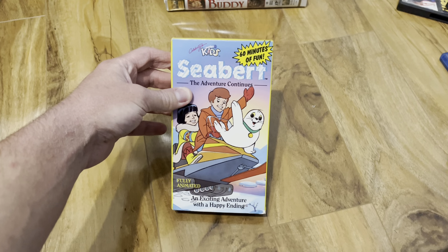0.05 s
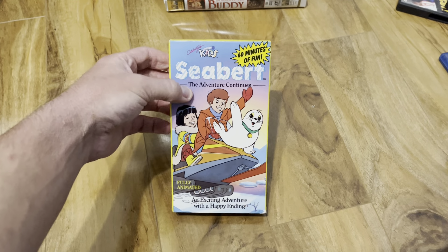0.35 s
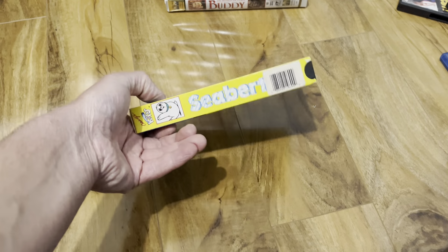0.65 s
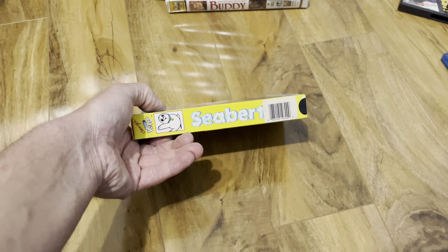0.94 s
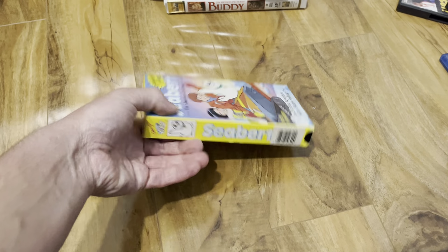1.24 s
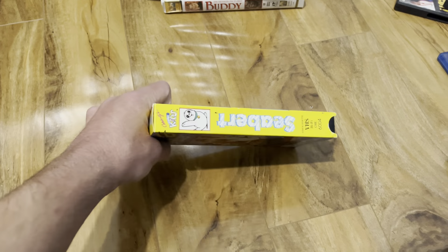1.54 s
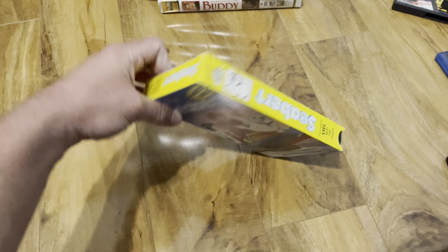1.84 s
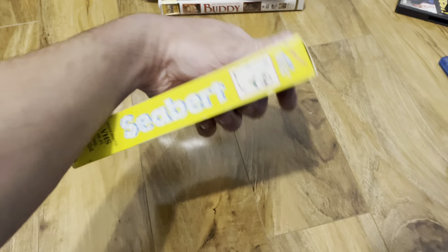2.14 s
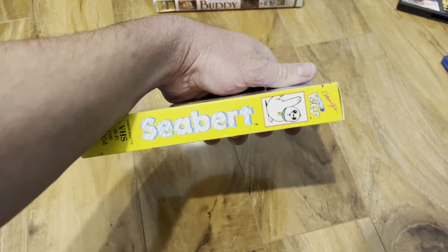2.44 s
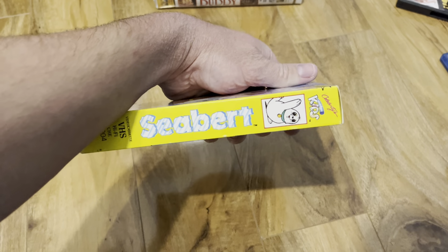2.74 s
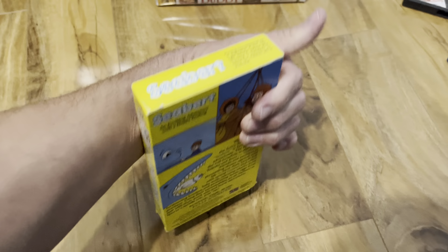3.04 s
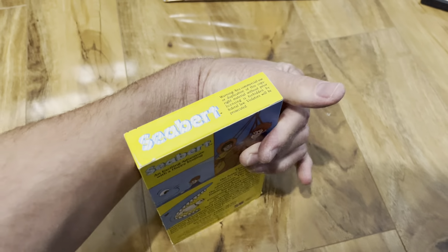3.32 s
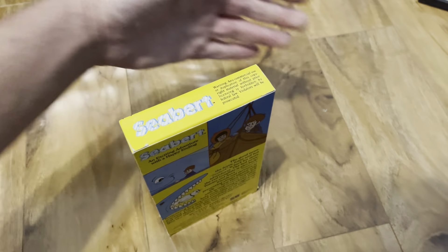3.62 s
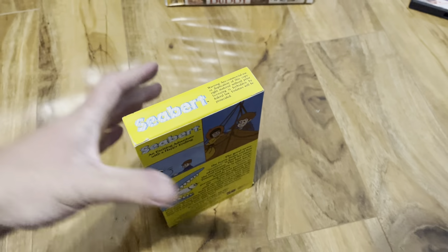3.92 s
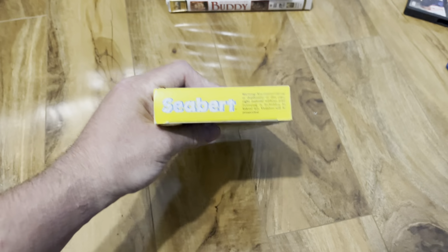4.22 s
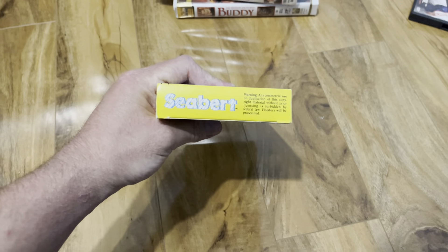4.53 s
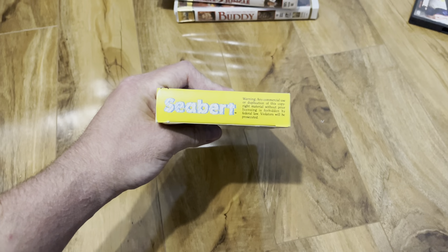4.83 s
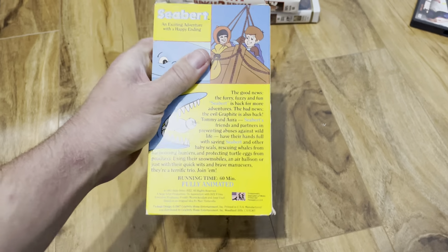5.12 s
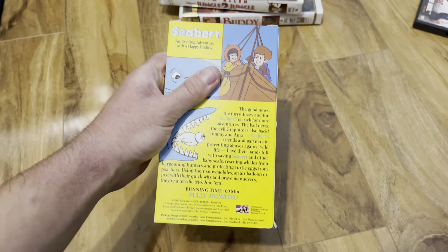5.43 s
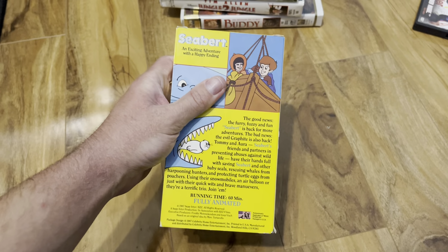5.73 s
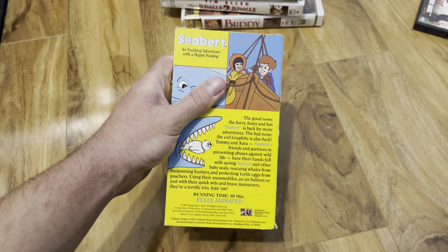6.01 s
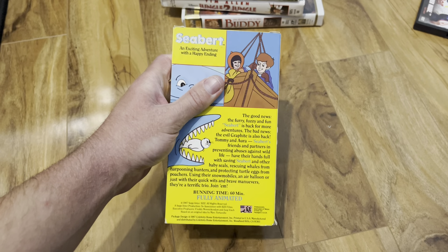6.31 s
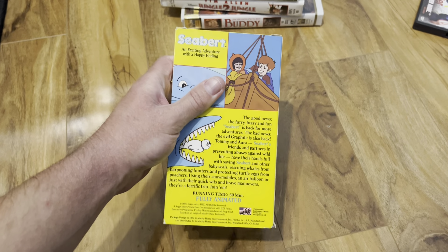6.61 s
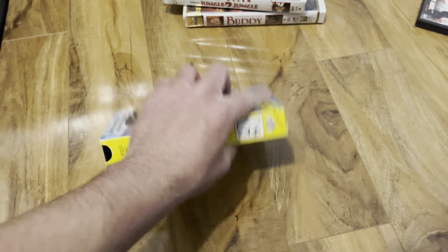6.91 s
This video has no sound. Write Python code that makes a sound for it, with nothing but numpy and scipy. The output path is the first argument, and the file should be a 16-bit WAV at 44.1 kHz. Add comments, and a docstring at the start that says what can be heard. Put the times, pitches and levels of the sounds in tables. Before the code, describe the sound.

A plastic video cassette in a cardboard sleeve is handled close to the microphone. Faint finger taps and rubbing lead to a light knock at 0.8 seconds. Around 1.3 to 1.4 seconds come louder hollow thuds, with a short rattle of loose plastic as the cassette shifts inside. Skin slides on the card, swelling into another clattering knock at 2.1. After more scuffs and taps, the box knocks on the wooden floor at about 3.1. Soft rubbing and a faint low rumble of movement follow, then gentler rattling knocks near 4.1 and 5.1. It is almost quiet until 6.7, when fingers rub and tap again and the box lands with a loud clack at 7 seconds and a thud just after. A faint low hum runs underneath, and the small room adds a short echo.

```python
"""A plastic video cassette in its cardboard sleeve is turned by hand and set down on a wooden floor.
Each landing is a thud of the box and a rattle of the loose reels and flap, then a weaker rebound.
Fingers rub, catch and tap on the card, and the cassette shifts inside it.
A small room with a low hum answers; a close stereo microphone picks up soft bumps of handling."""
import sys
import numpy as np
from scipy import signal
from scipy.fft import rfft, irfft, next_fast_len
from scipy.io import wavfile
from scipy.ndimage import uniform_filter1d

SR = 44100
rng = np.random.default_rng(int(sys.argv[2]) if len(sys.argv) > 2 else 0)


def generate_wav(signal):
    """Clip the signal to [-1, 1] and save it as 16-bit WAV at the path in sys.argv[1]."""
    frames = np.transpose(np.atleast_2d(signal))
    scaled = np.clip(frames, -1, 1) * 32767
    pcm = np.round(scaled).astype(np.int16)
    wavfile.write(sys.argv[1], SR, pcm)


N = 315756
TAPS = 4096
TAP_HZ = np.fft.rfftfreq(TAPS, 1 / SR)
PADDED = next_fast_len(N + TAPS)


def amp(db):
    """Decibels to gain."""
    return 10 ** (np.asarray(db) / 20)


def unit(x):
    """Scales to rms 1."""
    return x / np.sqrt(np.mean(x ** 2) + 1e-20)


def read(points, hz):
    """Interpolates a table on a log-frequency axis."""
    f, value = np.transpose(points)
    return np.interp(np.log(hz + 1), np.log(f + 1), value)


def add(mix, s, sound):
    """Lays a sound into the mix at time s."""
    part = mix[..., max(round(s * SR), 0):][..., :sound.shape[-1]]
    part += sound[..., :part.shape[-1]]


def gate(t, start, end, attack_s, release_s):
    """Rises before the start, holds, falls after the end."""
    return np.clip(np.minimum((t - start) / attack_s, (end - t) / release_s) + 1, 0, 1)


def hump(hz, centre_hz, octaves):
    """Resonance, bell-shaped in log frequency."""
    return np.exp(-.5 * (np.log2((hz + 1) / centre_hz) / max(octaves, .1)) ** 2)


def treble(hz):
    """Share of a frequency in the top band."""
    return np.clip((hz - 7000) / 2500, 0, 1)


def causal(db):
    """Impulse response of a passive body with this gain over TAP_HZ."""
    log_gain = np.log(amp(np.concatenate([db, db[-2:0:-1]])))
    return np.fft.ifft(np.exp(np.conj(signal.hilbert(log_gain)))).real


def wander(shape, first_span, last_span):
    """Noise of rms 1, smoothed along its first axis, then its last."""
    rough = uniform_filter1d(rng.standard_normal(shape), first_span, axis=0)
    return unit(uniform_filter1d(rough, last_span))


def swing(t, hz, decay_cycles):
    """Heavily damped vibration with a soft start."""
    cycles = hz * t
    return np.sin(2 * np.pi * cycles) * np.exp(-cycles / decay_cycles) * (1 - np.exp(-cycles / .49))


# left-right likeness: (frequency [Hz], correlation [clipped to 0-1])
STEREO_LIKENESS = [(60, 0.96), (280, 0.64), (380, 1.16), (650, 0.28), (1100, 0.25), (3000, 0.44),
                   (7000, 0.14), (12000, 0.57)]
def pair(z, hz, power=1, least=0):
    """Blends two unrelated spectra into partly alike left and right."""
    likeness = np.clip(read(STEREO_LIKENESS, hz) ** power, least, 1)
    common, apart = z[0] * np.sqrt((1 + likeness) / 2), z[1] * np.sqrt((1 - likeness) / 2)
    return np.array([common + apart, common - apart])


# hum and hiss: (frequency [Hz], relative density [dB])
HUM_SPECTRUM = [(15, -37), (28, -13.5), (53, -4), (90, -10), (121, -7.5), (178, -14.5), (205, -14.5),
                (235, -13.5), (275, -14.5), (337, -14), (430, -18), (600, -30.5), (820, -35.5), (1400, -35),
                (2400, -45.5), (7000, -51), (16000, -61.5)]
def hum(level_db=-62.5):
    """Steady low noise of the room."""
    hz = np.fft.rfftfreq(N, 1 / SR)
    noise = pair(rfft(rng.standard_normal((2, N))), hz, power=2)
    return amp(level_db) * unit(irfft(noise * amp(read(HUM_SPECTRUM, hz)), N))


# room decay: (frequency [Hz], t60 [s])
ROOM_DECAY = [(100, 1.1), (300, 0.1154), (1000, 0.3277), (2500, 0.2655), (5000, 0.27), (10000, 0.2541),
              (15000, 0.28)]
# reflection strength: (frequency [Hz], gain [dB])
ROOM_GAIN = [(60, -11), (250, -8.5), (550, -8), (1000, -7), (2500, -5.5), (5000, -4.5), (11000, -10.5),
             (15000, -16)]
def room(x, first_s=.0027, build_s=.0031):
    """Dense floor and wall reflections, each band dying at its own rate."""
    hz, t, noise = signal.stft(rng.standard_normal((2, 2 * SR // 3)), SR, nperseg=256)
    hz = hz[:, None]
    t60 = read(ROOM_DECAY, hz)
    decay = amp(read(ROOM_GAIN, hz) - 60 * t / t60) * np.sqrt(2 * np.log(1000) / (t60 * SR))
    tail = signal.istft(pair(noise, hz) * decay, SR, nperseg=256)[1]
    tail *= np.clip((np.arange(tail.shape[1]) / SR - first_s) / build_s, 0, 1)
    return signal.fftconvolve(x, tail, axes=1)[:, :N]


def echoes(x):
    """The box moves, so its sound crossfades among three echo patterns."""
    turn = 2 * np.pi * np.arange(N) / SR
    weights = np.cos(turn), np.sin(turn) * np.cos(np.e * turn), np.sin(turn) * np.sin(np.e * turn)
    return sum(room(x * weight) for weight in weights)


# arm movements: (start [s], end [s], level [dB])
ARM_SWINGS = [(0.7, 1.5, -63.5), (2.052, 2.5, -58), (2.798, 2.951, -57), (3.4, 3.801, -49.5),
              (3.95, 4.3, -54.5), (6.4, 7.099, -63.5)]
def arm_rumble(centre_hz=58, width_octaves=.61, ramp_s=.21):
    """Low flutter as the arm swings round to change grip."""
    t, hz = np.arange(N) / SR, np.fft.rfftfreq(N, 1 / SR)
    noise = irfft(rfft(rng.standard_normal(N)) * hump(hz, centre_hz, width_octaves), N)
    swells = [amp(db) * gate(t, start, end, ramp_s, ramp_s) for start, end, db in ARM_SWINGS]
    return unit(noise) * np.max(swells, axis=0)


# handling bumps, and floor pushes under heavy landings: (time [s], relative level [dB], pitch [Hz])
LOW_BUMPS = [(0.697, -48, 47.7), (1.228, -52, 57), (2.112, -37, 85.05), (2.53, -44.5, 54.5),
             (2.785, -49, 64.9), (3.249, -48.5, 55.6), (3.753, -44.5, 167), (3.78, -40.5, 53.4),
             (4.246, -43, 60.8), (4.325, -48, 116.3), (6.653, -51.5, 54.1), (6.968, -35.5, 91)]
def bumps(gain_db=6):
    """Soft low pushes of the hand, or of the floor under a heavy landing, a cycle or two each."""
    out, t = np.zeros(N), np.arange(SR // 4) / SR
    for s, db, hz in LOW_BUMPS:
        age = hz * t / .93
        envelope = age * np.exp(1 - 1.25 * age)
        add(out, s, amp(db + gain_db) * envelope * np.sin(2 * np.pi * hz * t))
    return out


def swish(start_s=3.612, length_s=.1, level_db=-65.5, start_hz=4150, fall_hz_per_s=4500, width_hz=600):
    """The palm's ridges run off the sleeve's edge: a fuzzy pitch that falls as the hand slows."""
    out, t = np.zeros((2, N)), np.arange(0, length_s, 1 / SR)
    cycles = np.cumsum(start_hz - fall_hz_per_s * t) / SR
    noise = rng.standard_normal((2, len(t))) + 1j * rng.standard_normal((2, len(t)))
    blur = signal.sosfilt(signal.butter(2, width_hz / 2, fs=SR, output="sos"), noise)
    arch = np.sqrt(abs(np.sin(np.pi * t / length_s)))
    add(out, start_s, amp(level_db) * arch * unit((blur * np.exp(2j * np.pi * cycles)).real))
    return out


def catches(n, per_s):
    """Sparse stick-slip clicks of uneven size, separate per side."""
    return np.array([(rng.random(n) < per_s / SR) * rng.choice([-1, 1], n)
                     * amp(4.3 * np.minimum(rng.exponential(1, n), 3)) for side in range(2)])


def patchy(x, depth_db=3.5):
    """Friction grips unevenly, in patches about 20 ms long and narrow in frequency."""
    z = signal.stft(x, nperseg=512)[2]
    return signal.istft(z * amp(depth_db * wander(z.shape, 6, 4)), nperseg=512)[1][:, :N]


# strokes: (start [s], end [s], relative start level [dB], relative end level [dB], treble trim [dB])
RUB_STROKES = [(0.327, 0.39, -66, -71, -15), (0.418, 0.531, -56.5, -54.5, -14),
               (0.588, 0.642, -60, -62.5, -15.5), (0.74, 0.8, -64.5, -65, -11),
               (1.249, 1.292, -64, -59.5, -12), (1.735, 1.932, -68.5, -58, -10.5),
               (1.935, 2.093, -53.5, -43.5, -13.5), (2.852, 2.949, -53.5, -50, -8),
               (2.967, 3.127, -59, -60.5, -15.5), (3.282, 3.438, -60.5, -64, -12.5),
               (3.548, 3.685, -70.5, -61, 2), (3.71, 3.764, -60.5, -69, -12.5),
               (3.799, 4.025, -73.5, -59, -6.5), (4.975, 5.059, -61, -51, -8),
               (6.716, 6.836, -72.5, -53.5, -12.5), (6.849, 6.94, -53, -63.5, -11)]
# skin on card: (frequency [Hz], relative density [dB])
RUB_SPECTRUM = [(100, -20), (330, 8), (750, -4), (1300, -3), (2400, -4.5), (4000, -8.5), (6600, -8.5),
                (9500, -5), (12500, -8.5), (14300, -14), (15600, -25)]
def rubbing(gain_db=-2, top_gain_db=4, catches_per_s=350, grain_db=-4, flutter_db=2):
    """Skin slides on card: a fine, uneven hiss with small catches."""
    t, hz = np.arange(N) / SR, np.fft.rfftfreq(N, 1 / SR)
    middle_gain, top_gain = np.zeros((2, N))
    for start, end, start_db, end_db, treble_db in RUB_STROKES:
        stroke = gate(t, start, end, attack_s=.026, release_s=.03)
        stroke *= amp(np.interp(t, [start, end], [start_db, end_db]))
        middle_gain = np.maximum(middle_gain, stroke)
        top_gain = np.maximum(top_gain, stroke * amp(treble_db + top_gain_db))
    grit = rng.standard_normal((2, N)) + amp(grain_db) * unit(catches(N, catches_per_s))
    friction = pair(rfft(patchy(grit)), hz) * amp(read(RUB_SPECTRUM, hz))
    middle = middle_gain * unit(irfft(friction * (1 - treble(hz)), N))
    top = top_gain * unit(irfft(friction * treble(hz), N))
    return amp(gain_db + flutter_db * wander(N, 500, 300)) * (middle + top)


def slide(length_s, db, centre_hz, octaves, slips_per_s=2500):
    """Tiny slips through one resonance of the card, swelling to a peak TAPS samples in."""
    t = np.arange(-TAPS, TAPS) / SR
    hz = np.fft.rfftfreq(len(t), 1 / SR)
    slips = pair(rfft(catches(len(t), slips_per_s)), hz)
    swell = np.exp(-2 * (t / length_s) ** 2)
    sound = swell * irfft(slips * hump(hz, centre_hz, octaves))
    return amp(db) * unit(sound) * np.sqrt(np.mean(swell ** 2))


# fingertip catches: (peak time [s], relative level [dB], centre [Hz])
FINGER_SCUFFS = [(.423, -55, 3800), (.58, -56.5, 1690), (.693, -66, 2740), (1.939, -46.5, 2680),
                 (2.916, -47, 3220), (2.93, -46.5, 2180), (3.397, -61, 3010), (3.481, -70, 3170),
                 (5.021, -53.5, 1490), (5.44, -80.5, 2200), (5.61, -78, 2000), (6.697, -71, 4980),
                 (6.888, -50.5, 3000)]
# cassette settling: (peak time [s], length [s], relative level [dB], centre [Hz], width [octaves])
CASSETTE_SHIFTS = [(0.821, 0.016, -32.5, 376, 1.45), (1.329, .032, -22.5, 370.6, 1.42),
                   (1.395, .05, -25, 562, 1.82), (2.109, 0.018, -26, 2180, 1.1),
                   (2.13, .024, -25, 258.4, 0.58), (3.137, .006, -25, 999, 0.7),
                   (3.15, .018, -39, 259, 1.4), (4.099, 0.039, -36, 259, 0.3),
                   (5.068, 0.021, -37, 1800, 1.8), (5.095, .013, -25, 560, 1.42),
                   (6.959, 0.015, -38, 2300, 0.9), (6.98, 0.0039, -18, 1610, 0.14),
                   (6.993, 0.033, -23.5, 396, 0.63)]
def scuffs(gain_db=2, finger_s=.00606, finger_octaves=.65):
    """Fingertips slip on the outside of the sleeve, the cassette on the inside."""
    out = np.zeros((2, N))
    for s, db, centre_hz in FINGER_SCUFFS:
        add(out, s - TAPS / SR, slide(finger_s, db + gain_db, centre_hz, finger_octaves))
    for s, length_s, db, centre_hz, octaves in CASSETTE_SHIFTS:
        add(out, s - TAPS / SR, slide(length_s, db + gain_db, centre_hz, octaves))
    return out


# floorboard modes: (highest pitch [Hz], relative level [dB], decay [cycles])
BOARD_MODES = [(223, -8.5, 0.52), (301, -6.5, 2.8)]
def floorboards(t, thud_db):
    """The boards vibrate under a knock, at a different pitch each time."""
    return sum(amp(thud_db + db) * swing(t, hz * rng.uniform(.75, 1), cycles)
               for hz, db, cycles in BOARD_MODES)


def hollow(t, thud_db, centre_hz=540, width_octaves=.84, gain_db=28, decay_ms=9.2):
    """The box rocks and its air cavity booms briefly."""
    rocking = rng.standard_normal(len(t)) * np.exp(-t * 1000 / decay_ms)
    cavity = hump(TAP_HZ, centre_hz, width_octaves)
    boom = irfft(rfft(rocking) * rfft(causal(20 * np.log10(cavity + 1e-4))))
    return amp(thud_db + gain_db) * boom / np.linalg.norm(boom) * np.sqrt(np.mean(cavity ** 2))


# cassette shell modes: (frequency [Hz], relative level [dB])
SHELL_MODES = [(265, -3.5), (335, -0.5), (500, 3), (620, -4), (943, -7.5), (1061, -5.5), (1160, -9),
               (1394, -7), (1469, -7), (1600, -9.5), (1954, -12.5), (2330, -15), (2474, -7.5), (3000, -13),
               (3306, -15.5), (3491, -16.5), (3880, -9.5)]
def shell_ring(t, thud_db, thud_hz, clack_db, gain_db=-13, t60_s=.07, rise_s=.00084):
    """The thud drives modes near its pitch, the clack the high ones; the sleeve damps them."""
    hz, db = np.transpose(SHELL_MODES)[:, :, None]
    drive = amp(thud_db) * hump(hz, thud_hz, .9) + amp(clack_db) * (hz > 1000)
    gripped_hz = hz * rng.uniform(.99, 1.01, hz.shape)  # the grip detunes the shell
    phase = rng.random(hz.shape)
    side_phase = (1 - read(STEREO_LIKENESS, hz)) * rng.uniform(-.5, .57, (2,) + hz.shape)
    modes = drive * amp(db + gain_db) * np.sin(2 * np.pi * (gripped_hz * t + phase + side_phase))
    return modes.sum(1) * np.exp(-np.log(1000) * t / t60_s) * (1 - np.exp(-t / rise_s))


def chatter(t, decay_ms, rise_s=.0008):
    """Dying burst of tiny contacts: even spectrum, energy 1 per side."""
    envelope = np.exp(-t * 1000 / decay_ms) * (1 - np.exp(-t / rise_s))
    spectra = rfft(rng.standard_normal((2, len(t))) * envelope)
    ripple_db = 10 * np.log10(uniform_filter1d(abs(spectra) ** 2, size=61) + 1e-9)
    burst = np.array([signal.fftconvolve(irfft(side), causal(-db))[:len(t)]
                      for side, db in zip(spectra, ripple_db)])
    return burst / np.linalg.norm(burst, axis=1, keepdims=True)


def sleeve_slap(t, thud_db, thud_hz, gain_db=21, decay_ms=8):
    """Spectrum of card slapping the shell: a dull burst around the thud's pitch."""
    card = causal(20 * np.log10(hump(TAP_HZ, thud_hz, octaves=1.4) + 1e-3))
    return amp(thud_db + gain_db) * rfft(chatter(t, decay_ms)) * rfft(card)


# plastic clack: (frequency [Hz], relative density [dB])
CLACK_SPECTRUM = [(40, -23), (110, -6.5), (250, 2.5), (550, 8), (780, 0.5), (1000, 5), (1500, 2),
                  (2400, 7.5), (3800, 2.5), (5200, -0.5), (7000, -2), (10000, -3), (12000, -5.5),
                  (14000, -15), (15500, -27)]
def rattle(t, clack_db, treble_db, decay_ms, gain_db=24.5, top_gain_db=10.5, spot_depth_db=2.5):
    """Spectrum of the loose reels and flap; each contact spot favours other resonances."""
    spot_db = spot_depth_db * wander(len(TAP_HZ), 25, 25)
    colour_db = read(CLACK_SPECTRUM, TAP_HZ) + spot_db + treble(TAP_HZ) * (treble_db + top_gain_db)
    return amp(clack_db + gain_db) * rfft(chatter(t, decay_ms)) * rfft(causal(colour_db))


def knock(t, thud_db, thud_hz, clack_db, treble_db, rattle_ms, thud_gain_db=12):
    """The box thuds on the boards, loose parts rattle, the sleeve slaps, the shell rings on."""
    thud = amp(thud_db + thud_gain_db) * swing(t, thud_hz, decay_cycles=1)
    boards = floorboards(t, thud_db)
    contacts = rattle(t, clack_db, treble_db, rattle_ms) + sleeve_slap(t, thud_db, thud_hz)
    clack = irfft(pair(contacts, TAP_HZ, least=.45))
    return thud + boards + clack + hollow(t, thud_db) + shell_ring(t, thud_db, thud_hz, clack_db)


# fingers on card: (time [s], thud drive [dB], thud pitch [Hz], clack drive [dB], treble trim [dB])
CARD_TAPS = [(0.3219, -57, 1760, -45, -5), (0.367, -46.5, 480, -56.5, -24), (0.565, -51.5, 330, -61, -2.5),
             (1.981, -31.5, 426, -40, -18.5), (2.047, -47.5, 506.6, -44, -16.5),
             (2.756, -71, 460, -64, -18), (2.8467, -42, 1547, -38, -16.5),
             (3.0001, -51.5, 1080, -40.5, -19), (3.019, -47, 1180, -38.5, -13.5),
             (3.253, -49.5, 302, -46, -10), (3.437, -57, 340, -61.5, -5), (3.574, -50, 375, -74, -1),
             (4.019, -33, 510, -56, -14), (4.03, -39.5, 461.8, -41, -9.5),
             (4.956, -53.5, 420.3, -73.5, -12.5), (6.756, -49.5, 532.5, -62, -11),
             (6.804, -45, 450, -62.5, -14), (6.833, -45, 1100, -48, -10)]
# box on floor, or cassette on sleeve end:
# (time [s], thud drive [dB], thud pitch [Hz], clack drive [dB], treble trim [dB], rattle decay [ms])
LANDINGS = [(0.8058, -25.5, 518, -25.5, -16, 5.6), (0.813, -26.5, 244, -35.5, -25, 1.9),
            (1.3033, -10, 470, -11.5, -10.5, 3.9), (1.386, -18.5, 322, -21.5, -13, 6.9),
            (1.401, -12.5, 910, -10, -9, 2.9), (1.4045, -15.5, 490, -21.5, -15, 1.8),
            (2.0915, -35.5, 1500, -13.5, -13.5, 5), (2.109, -13.5, 1110, -16, -13, 5),
            (2.1159, -18, 344, -23.5, -13, 3.1), (3.1345, -17.5, 944, -25, -11.5, 4),
            (4.057, -33.5, 1170, -32.5, -17, 7.7), (4.087, -24.5, 391, -26.5, -12, 5.6),
            (4.098, -26.5, 1037, -32, -9.5, 3.4), (4.114, -34.5, 446, -27, -14, 2.8),
            (5.0624, -29, 967, -24.5, -11.5, 6.1), (5.0885, -24, 340, -23, -13, 4.4),
            (5.099, -26, 291.2, -28, -16, 2.8), (6.965, -7, 1407, -10.5, -9, 4.1),
            (6.977, -12.5, 1530, -14, -18, 12), (7.1162, -7.5, 365, -19.5, -14, 2.2)]
def knocks(rebound_s=.014, tap_rattle_ms=4.2, radiate_hz=125):
    """Landings and finger taps; after a landing the loose cassette drops back, weaker and lower."""
    out, t = np.zeros((2, N)), np.arange(TAPS) / SR
    for s, thud_db, thud_hz, clack_db, treble_db, rattle_ms in LANDINGS:
        add(out, s, knock(t, thud_db, thud_hz, clack_db, treble_db, rattle_ms))
        rebound = knock(t, thud_db - 15, thud_hz * .8, clack_db - 13, treble_db, rattle_ms)
        add(out, s + rebound_s, rebound)
    for s, *tap in CARD_TAPS:
        add(out, s, knock(t, *tap, tap_rattle_ms))
    # a small box radiates little bass
    return signal.sosfilt(signal.butter(2, radiate_hz, "high", fs=SR, output="sos"), out)


def floor_push(gain_db=-27, pitch_range_hz=(60, 66.75), decay_cycles=1.6):
    """The weight of each landing pushes the floor into a brief low swing."""
    out, t = np.zeros(N), np.arange(SR // 6) / SR
    for s, thud_db, *_ in LANDINGS:
        add(out, s, amp(thud_db + gain_db) * swing(t, rng.uniform(*pitch_range_hz), decay_cycles))
    return out


# microphone port balance: (frequency [Hz], left minus right [dB])
PORT_BALANCE = [(60, 2), (300, 3), (700, 2.5), (1500, 0.5), (2500, -0.5), (4000, 4), (7000, 1), (10000, 0)]
# microphone port phase: (frequency [Hz], left lead [rad])
PORT_LEAD = [(30, 0), (120, .15), (400, .4), (1000, .3), (1500, 1.0), (2200, 1.1), (4000, .7), (6000, -1.4),
             (9000, -3.8), (11000, -5.2), (14000, -5.8)]
def scene():
    """Close cassette, echoes and low background at the two microphone ports."""
    near = knocks() + rubbing() + scuffs() + swish()
    mix = near + echoes(near) + floor_push() + bumps() + arm_rumble() + hum()
    hz, side = np.fft.rfftfreq(PADDED, 1 / SR), np.array([[.5], [-.5]])
    ports = amp(side * read(PORT_BALANCE, hz)) * np.exp(1j * side * read(PORT_LEAD, hz))
    return irfft(rfft(mix, PADDED) * ports, PADDED)[:, :N]


def record(dry, dip_hz=8450, dip_width_hz=480, dip_db=17, low_cut_hz=38, high_cut_hz=15500):
    """Microphone: narrow treble dip, bass cut, rounded peaks, band limit."""
    hz = np.fft.rfftfreq(PADDED, 1 / SR)
    dip = amp(-dip_db * np.exp(-.5 * ((hz - dip_hz) / dip_width_hz) ** 2))
    coloured = irfft(rfft(dry, PADDED) * dip, PADDED)[:, :N]
    coloured = signal.sosfilt(signal.butter(2, low_cut_hz, "high", fs=SR, output="sos"), coloured)
    rounded = coloured / (1 + coloured ** 4) ** (1 / 4)
    band_limit = signal.firwin(255, high_cut_hz, window=("kaiser", 9), fs=SR)
    return signal.oaconvolve(rounded, band_limit[None], "same")


dry = scene()
out = record(dry)
generate_wav(out)
```